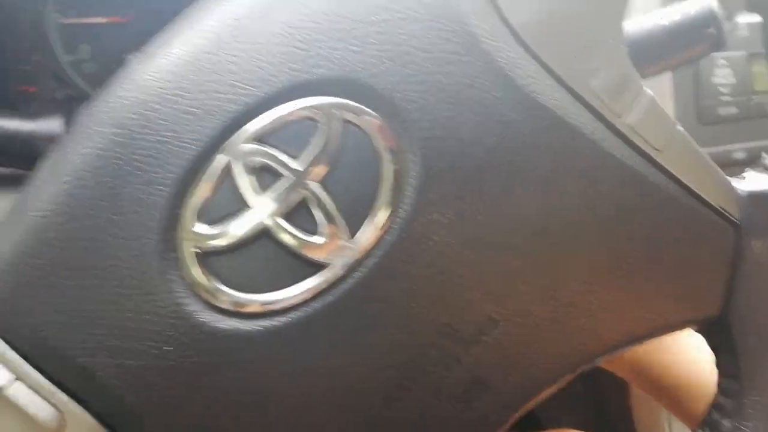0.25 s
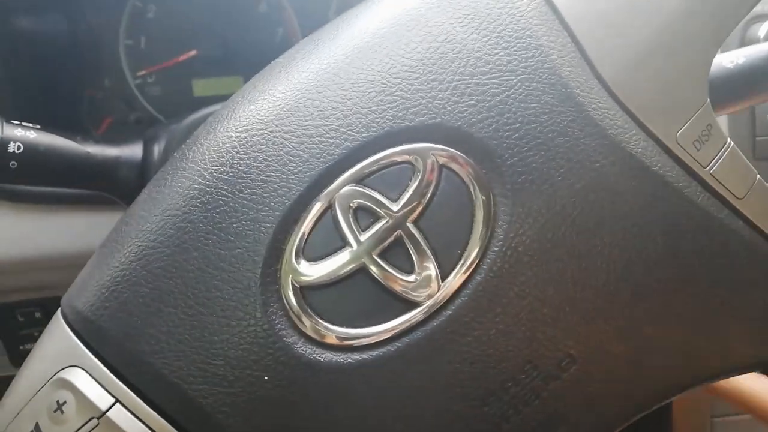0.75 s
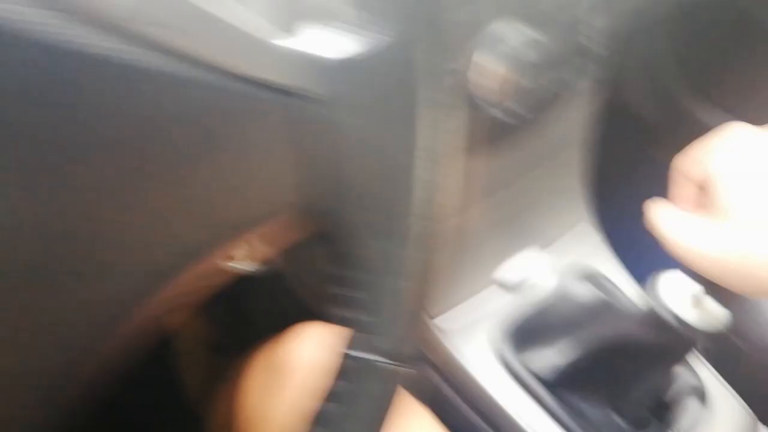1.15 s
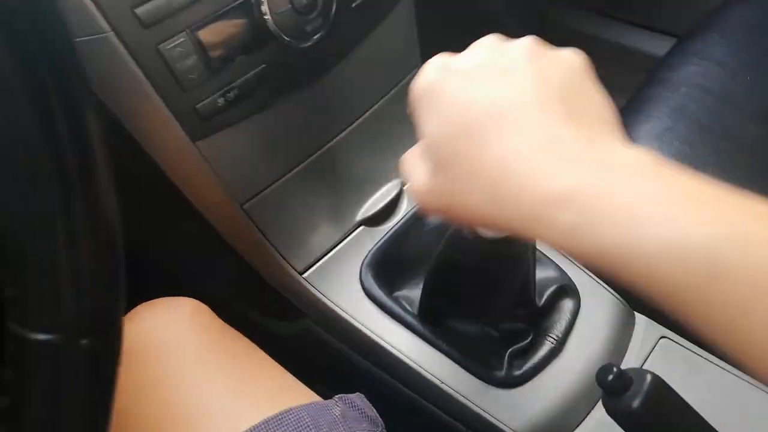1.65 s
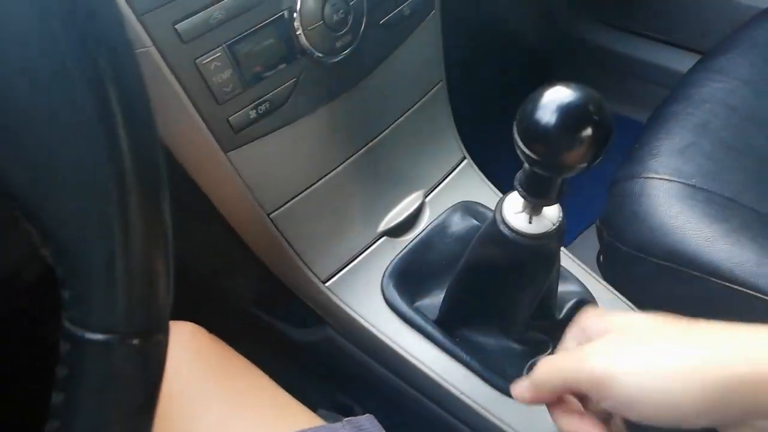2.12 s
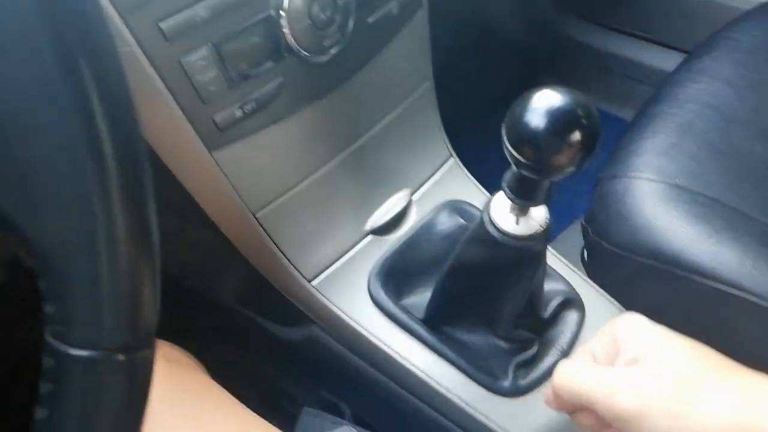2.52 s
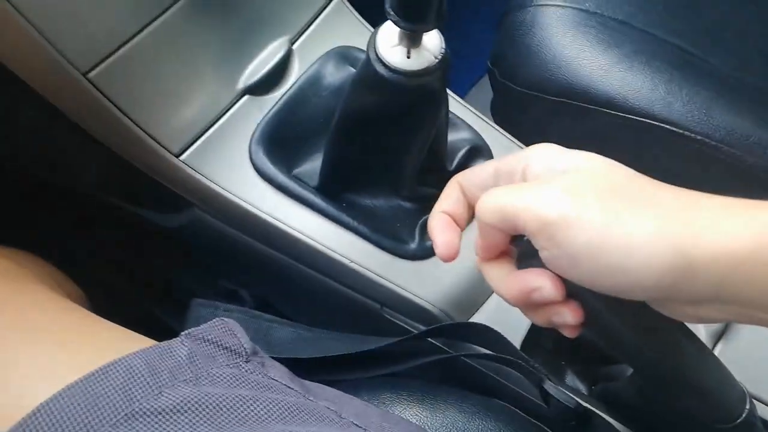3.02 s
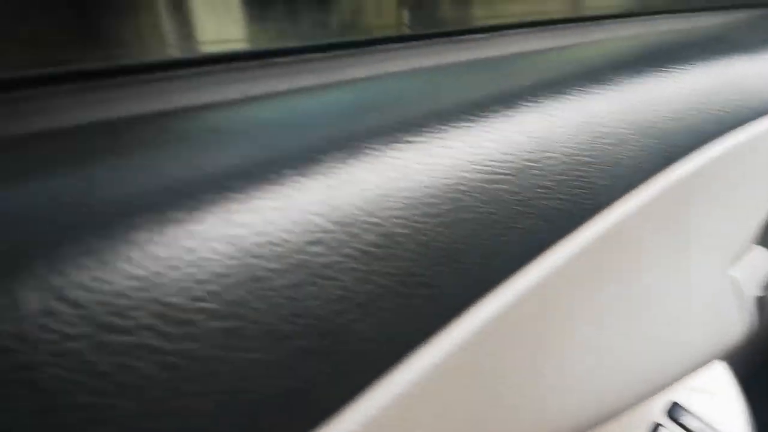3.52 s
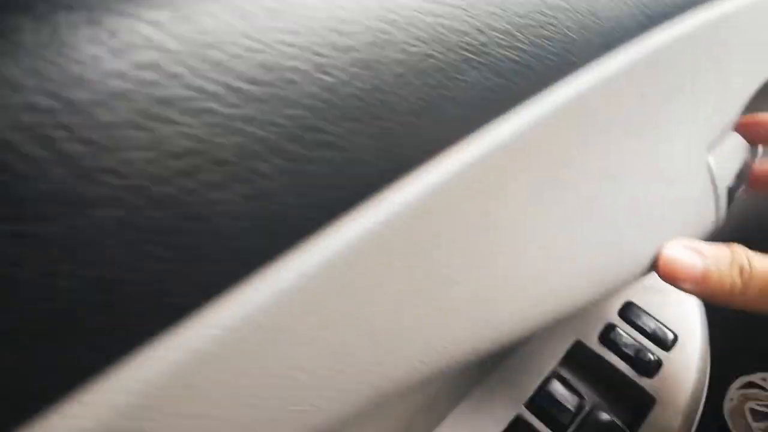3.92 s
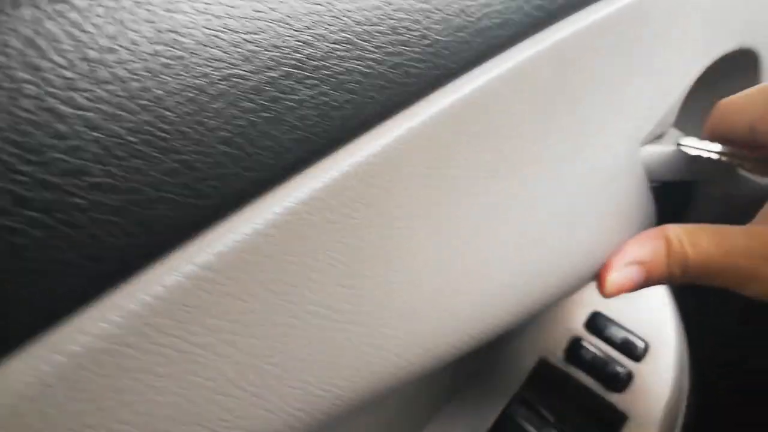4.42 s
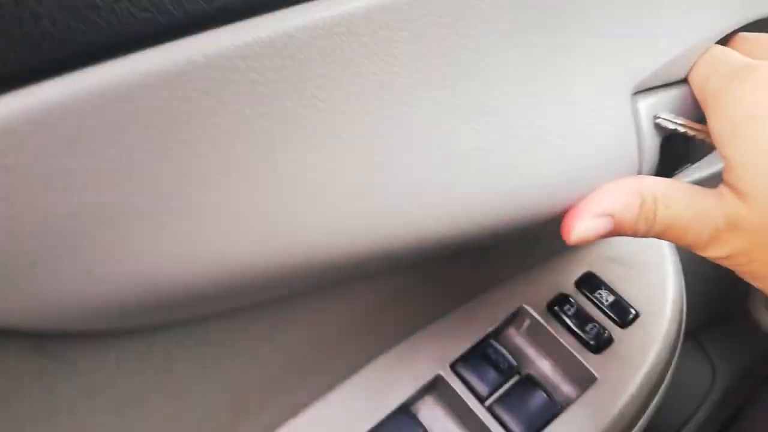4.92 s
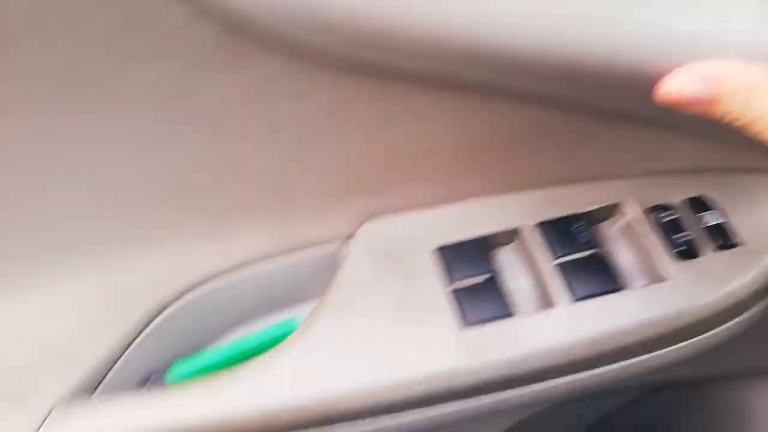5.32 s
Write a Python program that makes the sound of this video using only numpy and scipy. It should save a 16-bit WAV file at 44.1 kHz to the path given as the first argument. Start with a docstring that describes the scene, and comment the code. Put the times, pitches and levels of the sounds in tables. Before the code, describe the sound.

Close inside a small parked car, a key clicks and the low idle shudders to a stop. The gear lever knocks dully with gritty linkage sounds, then the handbrake clicks. Keys jingle brightly, cloth brushes, the door handle snaps the latch and the door thuds off its seal. Outside air slowly grows, with small plastic ticks. Handheld microphone at the driver's seat, mono, with faint hiss.

```python
"""Inside a parked car, from the driver's seat: the ignition key clicks off, the idle shudders to a stop.
Gear lever, handbrake and trim knock and tick (coloured noise bursts, low booms); keys jingle (damped sines).
Cloth brushes the seat; the handle is pulled, the latch snaps and the door thuds off its seal.
Behind it lie cabin rumble, rushing air and hiss, all shaped noise; the air grows after the door opens."""
import sys
import numpy as np
from scipy import signal
from scipy.fft import rfft, irfft, next_fast_len
from scipy.io import wavfile
from scipy.ndimage import uniform_filter1d

SR = 44100
rng = np.random.default_rng(int(sys.argv[2]) if len(sys.argv) > 2 else 0)


def wav_record(signal):
    """Record a signal, one row per channel, as 16-bit PCM in the file named by sys.argv[1]."""
    frames = np.transpose(np.atleast_2d(signal))
    bounded = np.clip(frames, -1, 1)
    # unit amplitude maps onto the largest positive 16-bit level
    quanta = np.round(bounded * 32767).astype(np.int16)
    wavfile.write(sys.argv[1], SR, quanta)


N = 244931
TIME = np.arange(N) / SR  # s, whole scene
AGE = np.arange(SR // 2) / SR  # s, since one sound began

# Spectrum of small plastic parts, clicking or rattling: f/Hz, relative level/dB
CLICK_COLOUR = [(120, 4.5), (200, -3), (647, -9.5), (1040, -13.5), (2250, -11), (3120, -15), (3470, -16.5),
                (6900, -17.5), (7420, -15.5), (10800, -35), (15000, -42)]


def amp(db):
    """Decibels to gain."""
    return 10 ** (np.asarray(db) / 20)


def unit(x):
    """Scale to rms 1."""
    return x / np.sqrt(np.mean(x ** 2) + 1e-20)


def add(track, s, sound):
    """Mix a sound in, starting at s seconds."""
    start = max(round(s * SR), 0)
    part = sound[:max(N - start, 0)]
    track[start:start + len(part)] += part


def noise(colour, size):
    """Noise of rms 1 with a spectrum drawn through (f/Hz, level/dB) points."""
    hz, db = np.transpose(colour)
    m = next_fast_len(size)
    grid = np.fft.rfftfreq(m, 1 / SR)
    gain = amp(np.interp(np.log(grid + 1), np.log(hz + 1), db))
    white = rng.standard_normal(m)
    return unit(irfft(rfft(white) * gain, m)[:size])


def fade(t60):
    """Exponential decay by 60 dB in t60 seconds."""
    return np.exp(-np.log(1000) * AGE / t60)


def soft_start(attack):
    """Exponential approach to full level with time constant attack/s."""
    return 1 - np.exp(-AGE / attack)


def ring(modes, attack, phase=0):
    """Struck body: damped sines (f/Hz, level/dB, t60/s) with a soft start."""
    tone = sum(amp(db) * fade(t60) * np.sin(2 * np.pi * hz * AGE + phase) for hz, db, t60 in modes)
    return tone * soft_start(attack)


def contacts(rows, colour, grain_db, bass_hold=1.0):
    """Contacts (t/s, level/dB, rise/s, t60/s) swell and die in dense reflections; tiny slips make them grainy."""
    out = np.zeros(N)
    bass_filter = signal.butter(2, 700, fs=SR, output="sos")
    knots = AGE[::SR // 1000]  # a new slip about every millisecond
    for s, db, rise, t60 in rows:
        t = AGE - 3 * rise
        swell = np.exp(-(t / rise) ** 2)
        decay = np.exp(-np.log(1000) * np.abs(t) / t60)
        shape = np.where(t < 0, swell, decay)
        grain = np.interp(AGE, knots, rng.standard_normal(len(knots)))
        grains = unit(amp(grain_db * grain) * noise(colour, len(AGE)))
        bass = signal.sosfiltfilt(bass_filter, grains)
        # the bass lasts bass_hold times as long
        sound = shape * (grains - bass) + shape ** (1 / bass_hold) * bass
        add(out, s - 3 * rise, amp(db) * sound)
    return out


def booms(rows):
    """Soft blows through rubber mounts (t/s, peak level/dB, f/Hz, half length/s): brief cycles of cabin boom."""
    out = np.zeros(N)
    for s, db, hz, half in rows:
        near = np.abs(TIME - s) < 10 * half
        t = TIME[near] - s
        out[near] -= amp(db) * np.cos(2 * np.pi * hz * t) / np.cosh(np.pi / 2 * t / half)
    return out


def cabin(sound, wet_db, t60):
    """Direct sound plus short reflections of windscreen and trim, different for every position."""
    build_up = 1 - np.exp(-(AGE / 0.015) ** 2)
    tail = rng.standard_normal(len(AGE)) * fade(t60) * build_up
    reflections = signal.fftconvolve(sound, tail / np.linalg.norm(tail))[:len(AGE)]
    return sound + amp(wet_db) * reflections


def hiss(level_db=-63.0):
    """Faint steady high-pitched noise."""
    # Spectrum of the hiss: f/Hz, relative level/dB
    hiss_colour = [(590, -34), (1000, -9.5), (1940, -6), (3050, -6.5), (3300, -6.5), (14100, -8.5),
                   (16000, -9.5)]
    return amp(level_db) * noise(hiss_colour, N)


def cabin_rumble(gain_db=3):
    """Low noise in the cabin whose level wanders slowly."""
    # Course of the rumble: t/s, level before gain_db/dB
    rumble_course = [(0, -37), (1.35, -36.5), (1.8, -41), (2.05, -44), (2.7, -40), (3.0, -45.5),
                     (4.25, -41.5), (4.5, -38), (4.75, -39), (5.55, -35.5)]
    # Spectrum of the rumble: f/Hz, relative level/dB
    rumble_colour = [(8.8, 3), (15, 8), (21, 1.5), (48, -5), (70, -12), (130, -10), (207, -25),
                     (258, -21.5), (296, -30.5), (400, -41), (520, -79), (880, -120)]
    times, levels = np.transpose(rumble_course)
    return amp(np.interp(TIME, times, levels) + gain_db) * noise(rumble_colour, N)


def air_rush():
    """Noise of air: steady in the cabin, dying from the engine bay, puffing then growing through the door."""
    cabin_db = -59
    bay_db, bay_stop_s, bay_fall_db_per_s = -44.5, 0.44, 26
    open_s, outside_db, outside_rise_db_per_s = 4.41, -56.5, 14.5
    puff_db, puff_fall_db_per_s = -43, 70
    # Spectrum of the air: f/Hz, relative level/dB
    air_colour = [(88, -13), (150, 1), (221, -9), (331, -12), (936, -19), (3470, -34.5), (3970, -37),
                  (4810, -40), (5950, -37), (7210, -43), (15000, -60)]
    bay = amp(bay_db - bay_fall_db_per_s * np.maximum(TIME - bay_stop_s, 0))
    open_for = np.maximum(TIME - open_s, 0)
    growing = amp(outside_db + outside_rise_db_per_s * open_for)
    puff = amp(puff_db - puff_fall_db_per_s * open_for)
    outside = (TIME > open_s) * (growing + puff)
    return (amp(cabin_db) + bay + outside) * noise(air_colour, N)


def clothes(rise_s=.015):
    """The driver's arm and clothes brush the seat: soft grainy noise."""
    # Strokes of cloth: t/s, level/dB, t60/s
    rustles = [(1.4, -51.5, 0.083), (1.49, -50, 0.23), (2.3, -56, 1), (2.44, -58, .6), (3.7, -64.5, 0.95),
               (3.85, -50.5, 0.7), (3.98, -47, 0.12), (4.84, -46.5, 0.37)]
    cloth_colour = [(200, -27), (550, 5.5), (1000, -4.5), (1500, -5.5), (2200, -12.0),
                    (4000, -14.5), (9000, -26.5)]  # f/Hz, relative level/dB
    brushes = [(s, db, rise_s, t60) for s, db, t60 in rustles]
    return contacts(brushes, cloth_colour, grain_db=3.5)


def hinge(squeak_db=-62, start=5.04, length=0.27):
    """A faint thin squeak as the door begins to swing: narrow noise under one smooth swell."""
    swell = np.sin(np.pi * np.clip((TIME - start) / length, 0, 1))
    squeak_colour = [(3000, -50), (3780, -25), (3850, -4), (3970, -14), (4090, 0),
                     (4200, -22), (5000, -50)]  # f/Hz, relative level/dB
    return amp(squeak_db) * swell * noise(squeak_colour, N)


def engine(idle_db=-34, stop=0.39, coast=.03, count=9):
    """A steady idle gives way to ever slower compression strokes that rock the car on its mounts."""
    # the lag of each stroke on the idle's spacing grows by a factor
    firing_hz, first_stroke_s, lag_s, lag_growth = 26.62, .336, .004, 1.3
    # strokes weaken once the engine is nearly still
    stroke_db, stroke_hz, stroke_half_s, weaken_s, weaken_db_per_s = -17, 89.4, 0.006, .57, 69
    # the rocking swings widest at its peak time
    rock_db, rock_peak_s, rock_rise_db_per_s, rock_fall_db_per_s = -28, .45, 200, 28
    # Idle vibration at 1, 2, 3, .. times the firing rate: relative level/dB
    idle_harmonics = [-4, -8, 1, 0, -12, -22, -23]
    turns = firing_hz * TIME
    idle = sum(amp(db) * np.sin(2 * np.pi * (k * turns + rng.random()))
               for k, db in enumerate(idle_harmonics, start=1))
    running = np.clip((stop - TIME) / coast + .5, 0, 1)

    gaps = 1 / firing_hz + lag_s * lag_growth ** np.arange(count)
    times = first_stroke_s + np.append(0, np.cumsum(gaps))
    strokes = [(s, stroke_db - weaken_db_per_s * max(s - weaken_s, 0), stroke_hz, stroke_half_s)
               for s in times]

    late = TIME - rock_peak_s
    swing_db = rock_db + np.minimum(rock_rise_db_per_s * late, -rock_fall_db_per_s * late)
    cycles = np.interp(TIME, times, np.arange(len(times)))  # one rock per stroke
    rocking = amp(swing_db) * np.sin(2 * np.pi * cycles)
    # sqrt(2) turns the rms levels of idle and rocking into sine peaks
    return np.sqrt(2) * (amp(idle_db) * running * idle + rocking) + booms(strokes)


def ignition_switch():
    """The ignition switch clicks over: a few contacts in quick succession."""
    # Contacts of the switch: t/s, level/dB, rise/s, t60/s
    switch_contacts = [(.227, -52, 0.0019, 0.15), (.2445, -20.5, 0.0021, 0.086), (.255, -25, 0.0024, 0.05)]
    # Spectrum of the switch: f/Hz, relative level/dB
    switch_colour = [(180, -42), (300, -5), (614, 4), (1030, -0.5), (1210, 3), (1640, -1.5), (1840, 4.5),
                     (2520, -7), (2840, 2.5), (3520, -1.5), (6960, 0.5), (8790, -3), (16000, -27)]
    return contacts(switch_contacts, switch_colour, grain_db=1.5)


def plastic_clicks(rise_s=0.0022, t60=0.091):
    """Handbrake and trim click; a part in the dashboard ticks as the engine stops."""
    # Clicks: t/s, level/dB
    click_times = [(.743, -46), (1.976, -34), (2.009, -30), (3.448, -45.5), (3.99, -54), (4.081, -50.5),
                   (4.337, -42), (4.739, -32.5), (4.852, -40), (5.055, -41), (5.212, -46.5)]
    # Modes of the dashboard part: f/Hz, level before the soft start/dB, t60/s
    dash_modes = [(720, -40, 0.06), (2010, -46, 0.088)]
    rows = [(s, db, rise_s, t60) for s, db in click_times]
    out = contacts(rows, CLICK_COLOUR, grain_db=2.0, bass_hold=1.6)
    add(out, .745, ring(dash_modes, attack=0.0017))
    return out


def knocks():
    """Knocks on lever, console and trim boom and shake a panel, which rings an octave higher; seat and floor bump."""
    knock_hz, knock_half_s = 141.5, 0.013
    panel_ring_db, panel_rise_s, panel_t60 = -5, .011, .18
    # Soft knocks: t/s, boom level/dB, panel noise level/dB
    knock_times = [(1.2, -28.5, -32.5), (1.421, -18, -29.5), (1.496, -22.5, -26), (1.56, -26.5, -29),
                   (1.712, -36, -41), (1.999, -33, -42.5), (3.098, -32.5, -50), (3.86, -47, -44.5),
                   (4.295, -53, -46), (4.756, -50, -43), (5.215, -48, -43), (5.54, -28, -34)]
    # Spectrum of the panel: f/Hz, relative level/dB
    panel_colour = [(100, 2.5), (190, -8.5), (265, 8), (340, -5.5), (420, -10.5), (600, -20), (1000, -21.5),
                    (2000, -71)]
    # Dull bumps of seat and floor: t/s, peak level/dB, f/Hz, half length/s
    bumps = [(1.165, -29, 62.5, .021), (2.341, -25, 86, 0.0037), (2.745, -30.5, 40.4, 0.047)]
    boom = booms([(s, db, knock_hz, knock_half_s) for s, db, _ in knock_times])
    note = booms([(s, db + panel_ring_db, 2 * knock_hz, knock_half_s) for s, _, db in knock_times])
    shaken = [(s, db, panel_rise_s, panel_t60) for s, _, db in knock_times]
    panel = contacts(shaken, panel_colour, grain_db=1.5)
    return boom + note + panel + booms(bumps)


def gear_linkage():
    """The lever's linkage sticks and slips, hardest in the middle of a slide."""
    spacing_s, rise_s, t60, edge_db = .02, 0.0039, 0.1, 11  # edge_db: softening towards both ends
    # Slides: start t/s, length/s, level at the middle/dB
    slides = [(1.143, .02, -50), (1.224, .08, -40), (1.359, .02, -50.5), (1.489, .08, -36),
              (1.644, .02, -45.5), (1.701, .02, -57)]
    # Spectrum of the linkage: f/Hz, relative level/dB
    slide_colour = [(300, 0.5), (1100, -9), (1380, 0.5), (1600, 4), (1900, -4), (2200, 2), (2510, -0.5),
                    (2750, -3), (3000, -4.5), (4300, -8), (5000, -14.5), (7500, -15), (12000, -55)]
    rows = []
    for start, length, db in slides:
        n = max(round(length / spacing_s), 1)
        for k in range(n):
            off_centre = abs(2 * k + 1 - n) / n
            rows.append((start + k * spacing_s, db - edge_db * off_centre, rise_s, t60))
    return contacts(rows, slide_colour, grain_db=2.5)


def touches(rebound_db=-6):
    """Jolted keys swing back and touch again more softly: (t/s, free swing/s, four relative levels/dB)."""
    # Jolts: t/s, relative levels/dB of touch, low, middle and high ring, rebounds (rounded), free swing/s
    jolts = [(.0014, -34.5, -40, -59, -44, 0.46, .094), (0.229, -34, -41, -59, -65, 0, .03),
             (.295, -31.5, -36.5, -48, -49, 0, 0.02), (0.344, -48, -54.5, -63, -64, 0, .02),
             (.406, -49.5, -49.5, -75, -61, 0, 0.025), (.481, -45, -58, -65, -75, 0, 0.013),
             (3.085, -51, -58, -58, -70, 0, 0.019), (3.11, -26, -52, -38, -34, 1, .022),
             (3.266, -29.5, -47, -36.5, -41, 0.85, .04), (3.3318, -28.5, -37, -36, -58, 0, 0.018),
             (3.455, -34.5, -49, -42.5, -44, 0, 0.011), (3.486, -34, -46, -51, -44, 2, .019),
             (3.586, -28, -45.5, -46.5, -54, 0, 0.035), (3.624, -37, -40.5, -67, -46, 0, .024),
             (3.8562, -27.5, -34, -49, -44, 0, 0.1), (4.0801, -38.5, -56.5, -73, -80, 0.21, .06),
             (4.2354, -27, -36.5, -48, -41.5, 0, 0.17), (4.558, -28, -43, -46, -48, 0, 0.017),
             (4.573, -25, -41.5, -31, -34, 0, 0.11), (4.662, -30, -33, -49, -40, 0, 0.095),
             (4.758, -33.5, -38, -63, -50.5, 0, 0.041), (4.948, -39, -49.5, -60, -60, 0, 0.047),
             (4.992, -39, -53, -57, -63, 0, 0.067), (5.2676, -33, -56, -47, -42.5, 1.2, .044),
             (5.353, -36, -42, -61, -49.5, 0, 0.03), (5.414, -37.5, -46.5, -60, -49.5, 2.54, .04)]
    rows = []
    for s, *levels, rebounds, swing in jolts:
        rows.append((s, swing, *levels))
        for k in range(round(rebounds)):
            rows.append((s + (k + 1) * swing, swing, *np.add(levels, rebound_db)))
    return rows


def keys(ring_db=6, minor_db=-14, clash_db=-16, clash_t60=0.16, scatter_db=3, clink_db=-18,
         clink_t60=0.025, choke_t60=0.039, count=7):
    """Each touch rings the keys in new proportions over a bright clash, until they rest against each other."""
    # Strongest modes, low to high: f/Hz, t60/s
    strong_modes = [(5745, 0.19), (7909, 0.12), (11492, 0.099)]
    # Weaker modes of the bunch: f/Hz, relative level/dB, t60/s
    weak_modes = [(2780, -14, 0.072), (3320, -12.5, 0.12), (3767, -3.5, 0.093), (4350, -1.5, 0.047),
                  (5990, -9, 0.22), (6600, -25, 0.036), (8470, -13.5, 0.27), (9370, -1.5, 0.072),
                  (13020, -0.5, 0.059), (13900, -12, 0.073), (15625, -9, .06)]
    clash_colour = [(600, -43), (1300, -1.5), (2200, -5.5), (3500, -1.0), (6000, 2.5), (8500, -2),
                    (12000, -6.0), (16000, -14)]  # f/Hz, relative level/dB
    out = np.zeros(N)
    for s, swing, db, *levels in touches():
        main = [(hz + rng.normal(0, 7.4), level + ring_db, t60)
                for (hz, t60), level in zip(strong_modes, levels)]
        minor = [(hz, db + minor_db + level + scatter_db * rng.normal(), t60)
                 for hz, level, t60 in weak_modes]
        # the other keys clink briefly, at pitches that depend on how they hang
        clinks = [(rng.uniform(3336, 12500), db + clink_db + scatter_db * rng.normal(), clink_t60)
                  for _ in range(count)]
        tone = ring(main, attack=0.002, phase=2 * np.pi * rng.random())
        tone = tone + ring(minor + clinks, attack=0.0041)
        # the free swing over, contact damps the ringing
        choke = np.exp(-np.log(1000) * np.maximum(AGE - swing, 0) / choke_t60)
        clash = amp(db + clash_db) * fade(clash_t60) * soft_start(0.00022) * noise(clash_colour, len(AGE))
        add(out, s, cabin(tone * choke, wet_db=-7.5, t60=0.049) + clash)
    return out


def latch():
    """The handle is pulled and the latch snaps, ringing its housing."""
    # Contacts of handle and latch: t/s, level/dB, rise/s, t60 above the bass/s
    latch_contacts = [(4.289, -37, .003, 0.13), (4.3435, -32, 0.0012, 0.057), (4.355, -27.5, .003, 0.056),
                      (4.362, -17, 0.0018, 0.058), (4.366, -23, .002, 0.075), (4.372, -29.5, 0.0022, 0.096)]
    # Spectrum of the latch: f/Hz, relative level/dB
    latch_colour = [(59, -33), (100, -5.5), (283, -2), (424, -0.5), (818, -5.5), (1100, -5), (1200, -8.5),
                    (1870, -8), (2040, -12), (2320, -12), (3190, -16.5), (5190, -20), (8640, -24.5),
                    (9410, -21.5), (16000, -47)]
    # Modes of the latch housing: f/Hz, level before the soft start/dB, t60/s
    housing_modes = [(424.5, -21.5, 0.1), (497, -37, 0.15), (1586, -5, 0.016), (1876, -14.5, 0.045),
                     (2247, -16, 0.036)]
    out = contacts(latch_contacts, latch_colour, grain_db=-0.5, bass_hold=2.26)
    add(out, 4.363, ring(housing_modes, attack=0.0045))
    return out


def door_release(rattle_db=-42, rattle_t60=0.052):
    """The seal pushes the door off its striker with a thud of door and cabin modes that rattles the trim."""
    # Contacts of the door: t/s, level/dB, rise/s, t60 above the bass/s
    door_contacts = [(4.403, -28, 0.0022, 0.15), (4.41, -18.5, .001, 0.098), (4.432, -24.5, .0015, 0.068)]
    # Spectrum of the door: f/Hz, relative level/dB
    door_colour = [(88, -39), (150, -5), (393, -21.5), (505, -15), (624, -22), (757, -21), (1050, -25),
                   (1300, -16), (1400, -21), (2920, -33.5), (3750, -40.5), (7080, -49.5), (15000, -70)]
    # Low modes of door and cabin: f/Hz, level before the soft start/dB, t60/s
    thud_modes = [(30, -25, 0.074), (89.2, -10.5, 0.222), (111.2, -17, 0.16), (167.5, -16.5, 0.2),
                  (246.7, -22, 0.14)]
    # Cabin pressure swings as the seal peels away: t/s, peak level/dB, f/Hz, half length/s
    seal_swings = [(4.439, -12, 90, 0.0115), (4.455, -19.5, 14.6, 0.073)]
    release = contacts(door_contacts, door_colour, grain_db=2.4, bass_hold=2.0)
    add(release, 4.4015, ring(thud_modes, attack=0.00096))
    shaken = [(s, rattle_db, rise, rattle_t60) for s, _, rise, _ in door_contacts[1:]]
    rattle = contacts(shaken, CLICK_COLOUR, grain_db=1.5, bass_hold=1.7)
    return release + rattle + booms(seal_swings)


def scene():
    """Everything as heard from the driver's seat, in one channel."""
    background = hiss() + cabin_rumble() + air_rush()
    controls = ignition_switch() + plastic_clicks() + knocks() + gear_linkage()
    door = latch() + door_release() + hinge()
    return (background + clothes() + engine() + controls + keys() + door)[None]


def record(dry, top_hz=15950):
    """The sound drops out for an instant; the microphone keeps nothing above its band limit."""
    sounding = (TIME < 3.073) | (TIME > 3.086)
    live = uniform_filter1d(1. * sounding, size=60)  # softened edges
    m = next_fast_len(N + SR // 2)
    in_band = np.fft.rfftfreq(m, 1 / SR) < top_hz
    return irfft(rfft(dry * live, m) * in_band, m)[..., :N]


dry = scene()
out = record(dry)
wav_record(out)
```